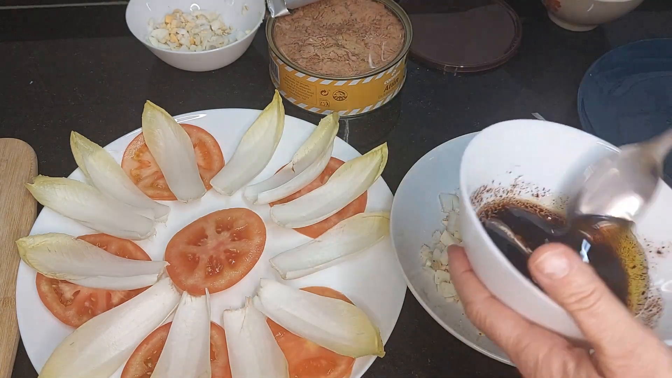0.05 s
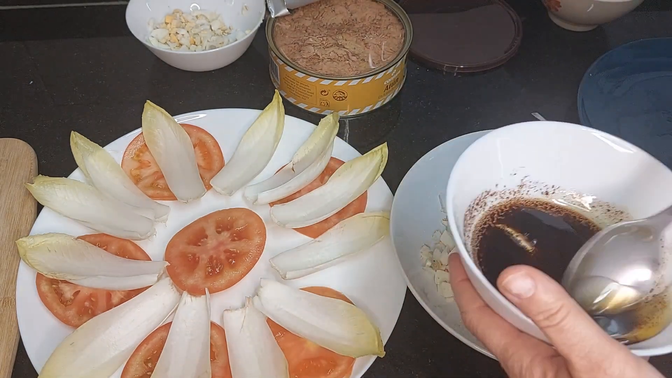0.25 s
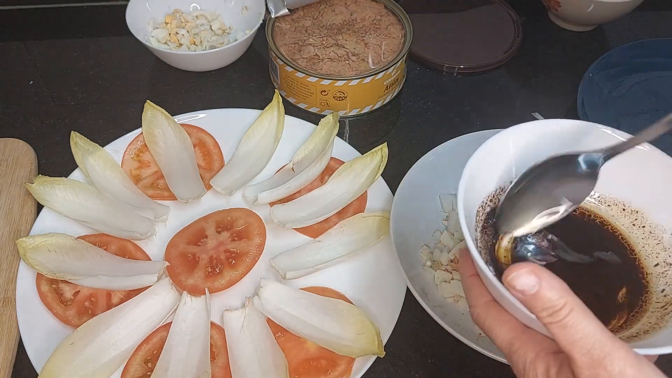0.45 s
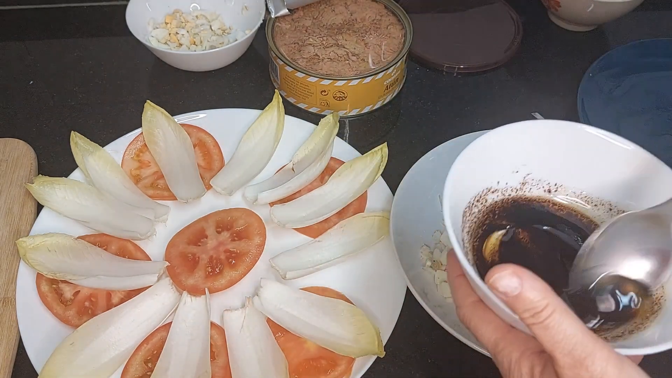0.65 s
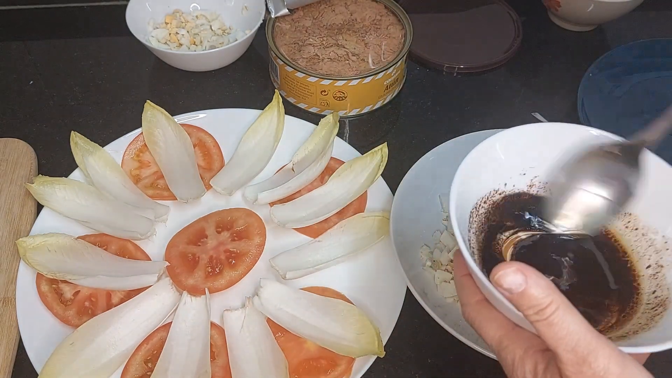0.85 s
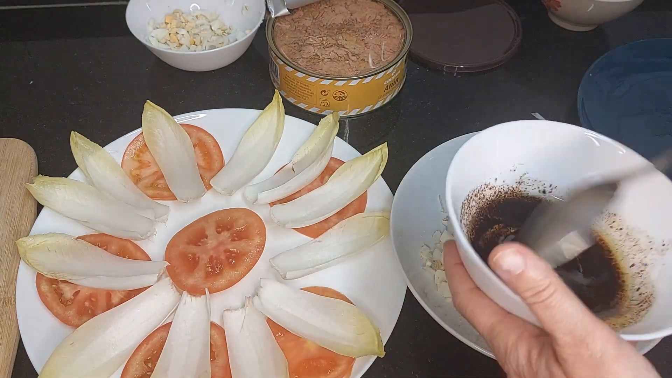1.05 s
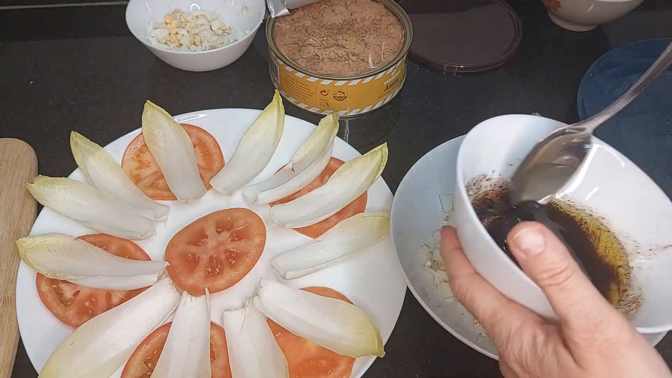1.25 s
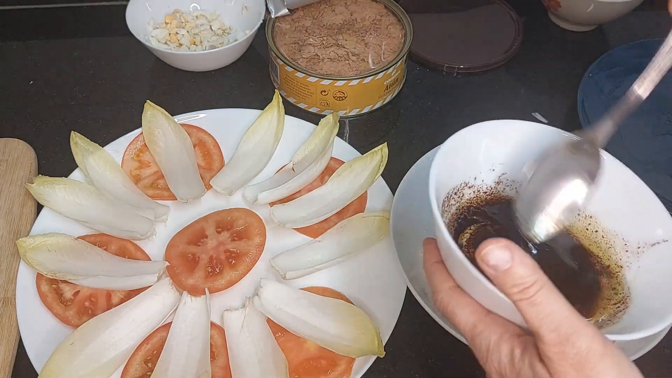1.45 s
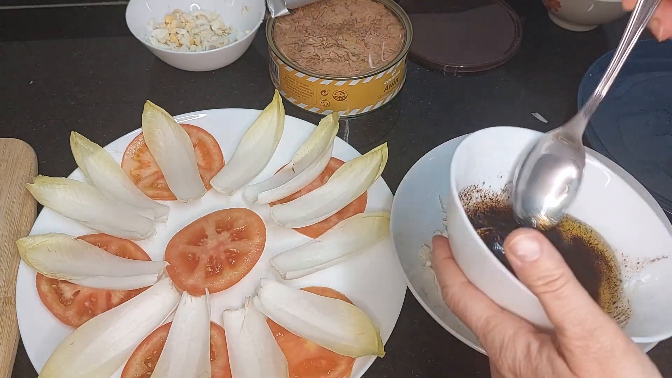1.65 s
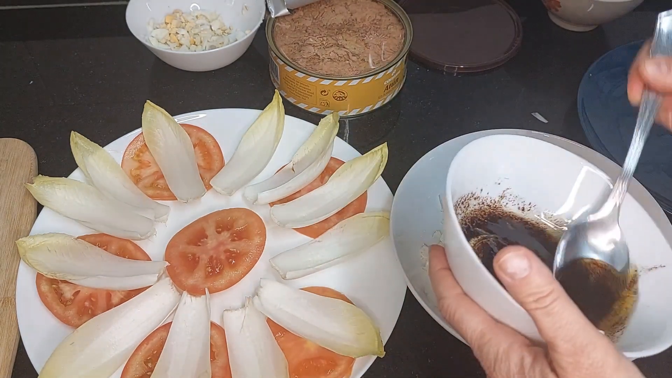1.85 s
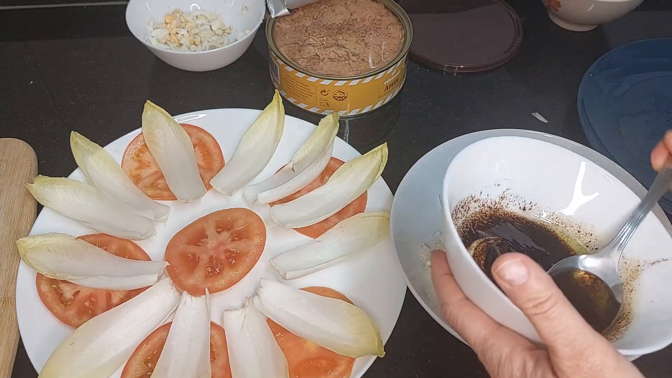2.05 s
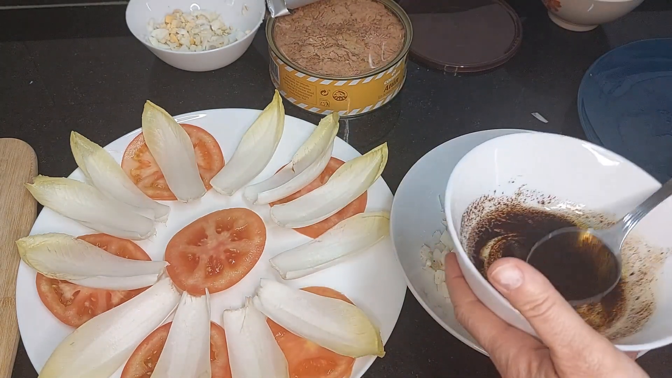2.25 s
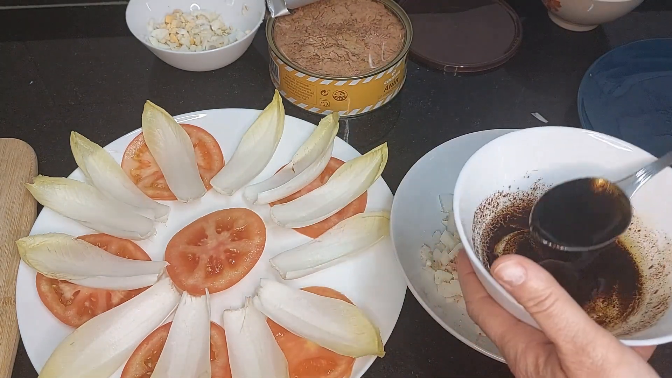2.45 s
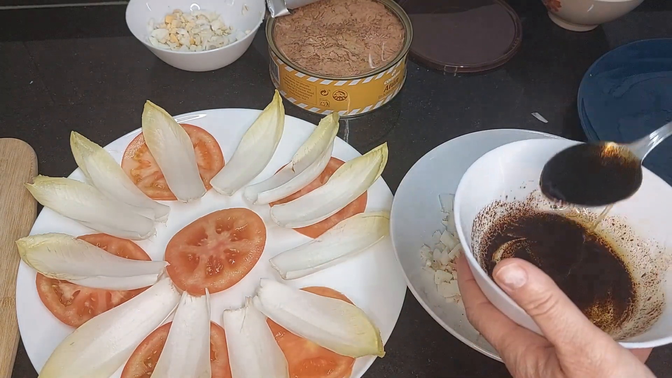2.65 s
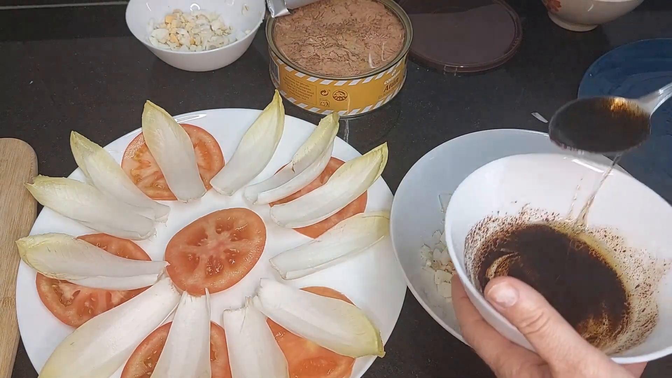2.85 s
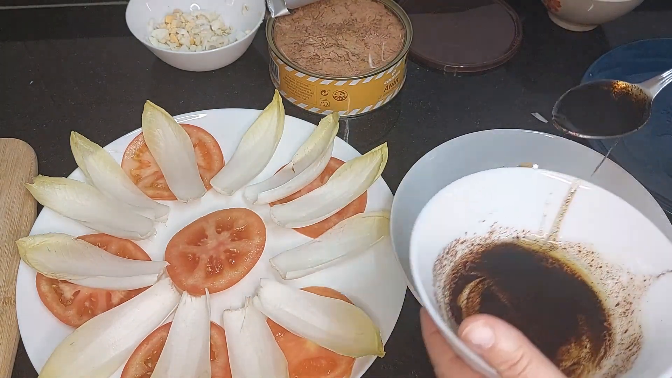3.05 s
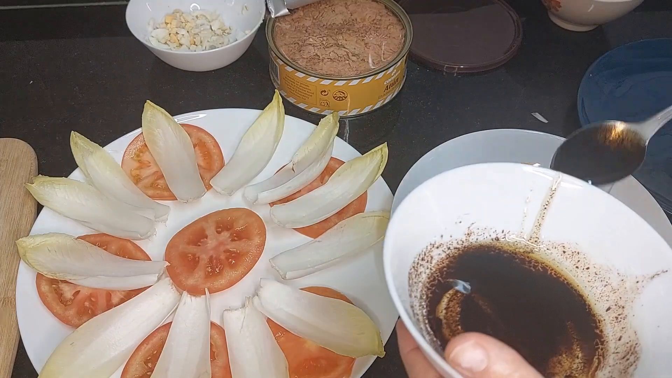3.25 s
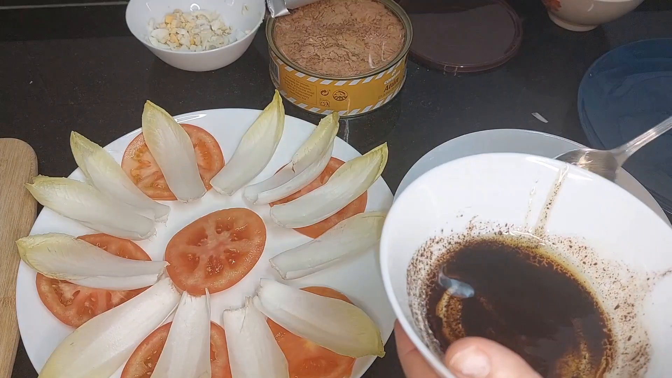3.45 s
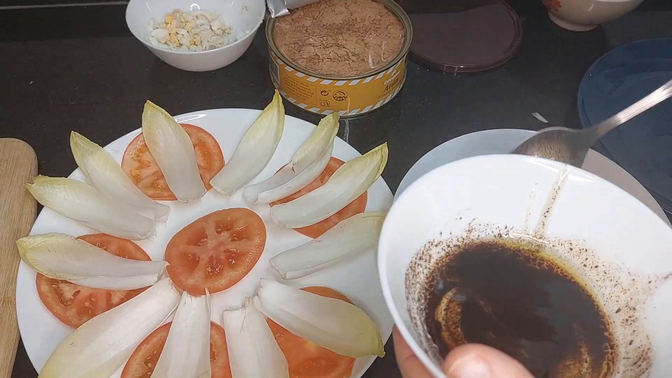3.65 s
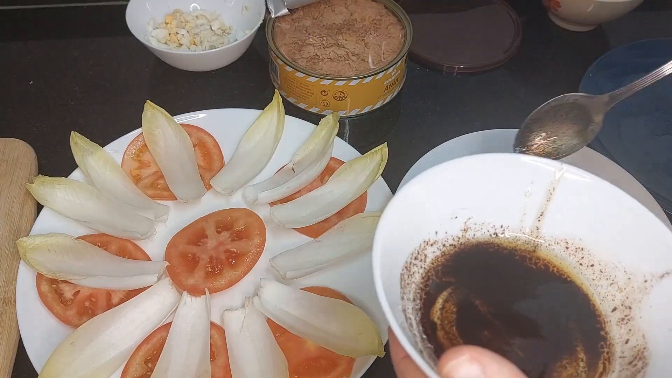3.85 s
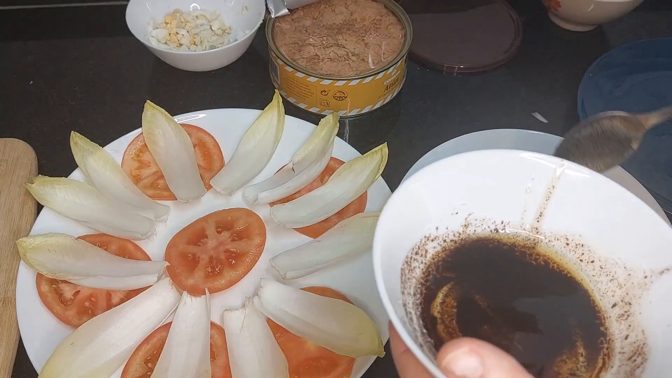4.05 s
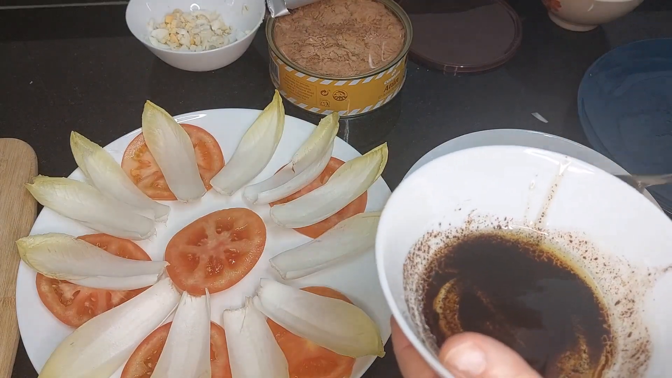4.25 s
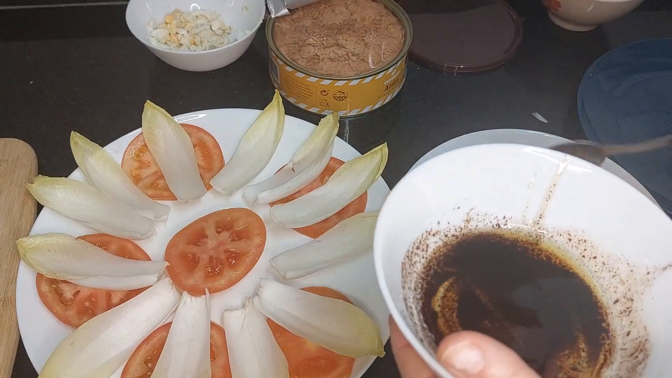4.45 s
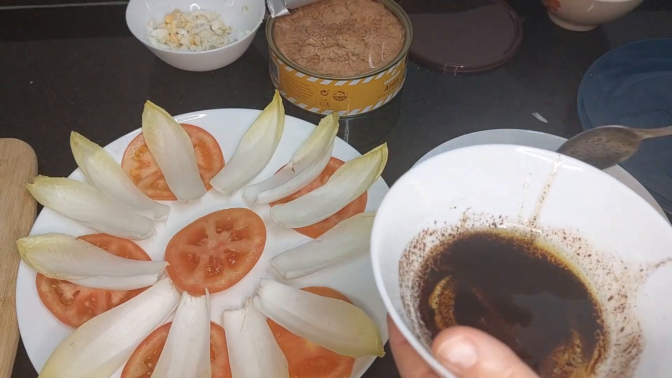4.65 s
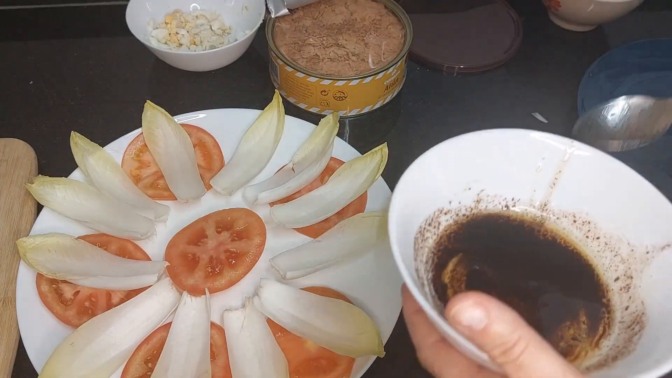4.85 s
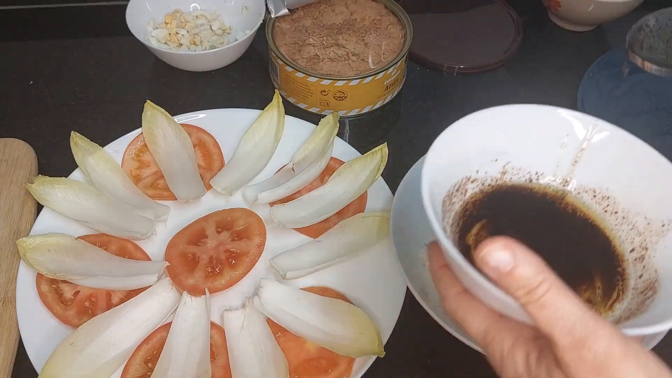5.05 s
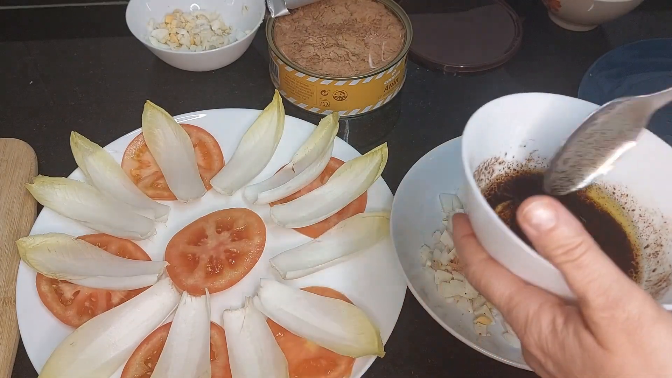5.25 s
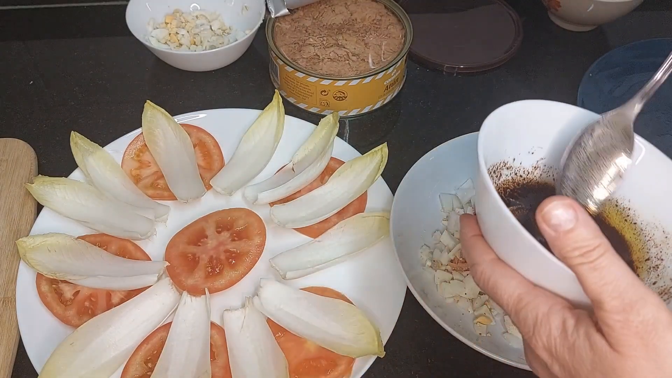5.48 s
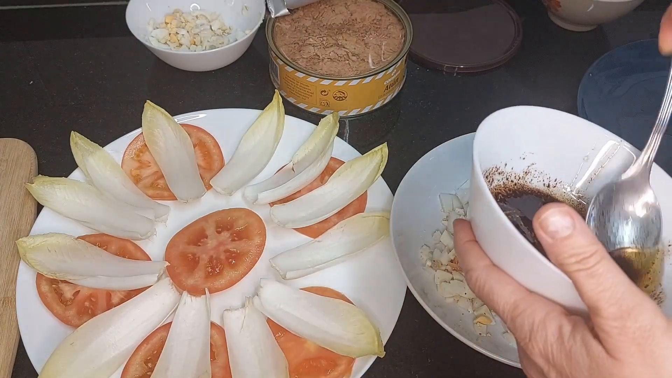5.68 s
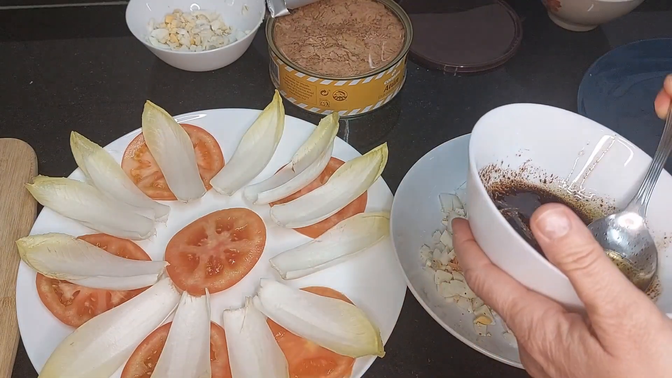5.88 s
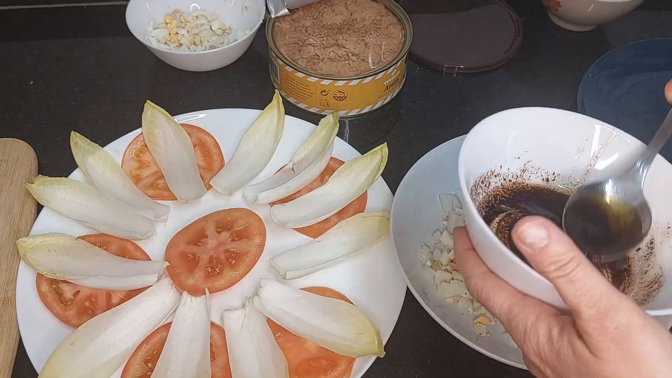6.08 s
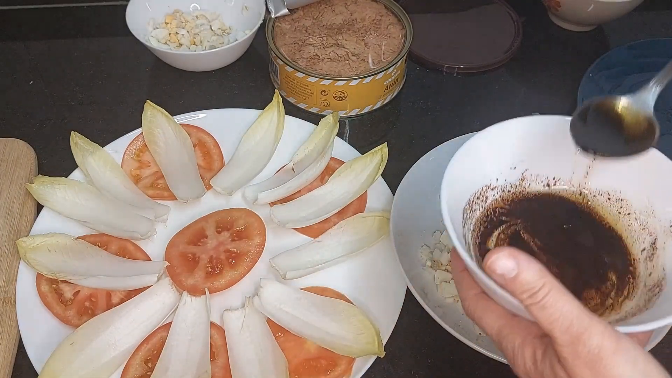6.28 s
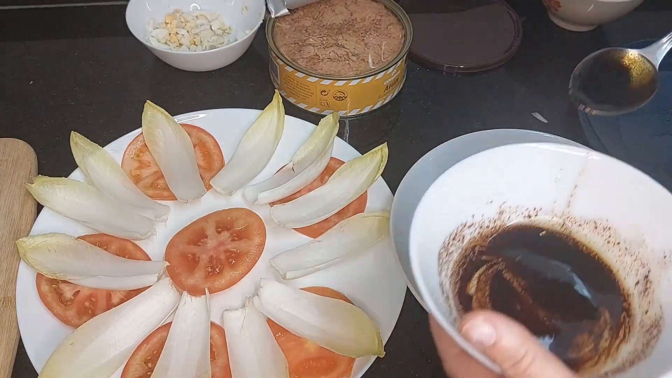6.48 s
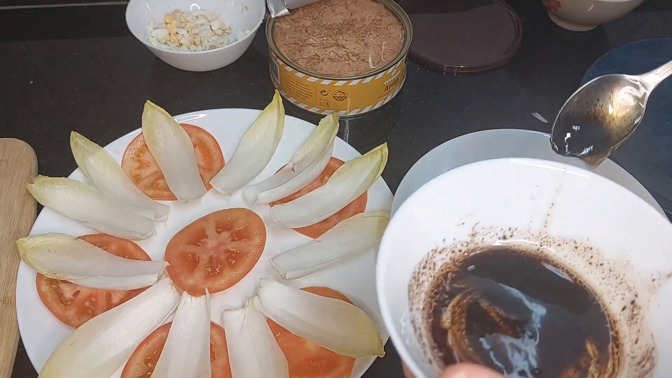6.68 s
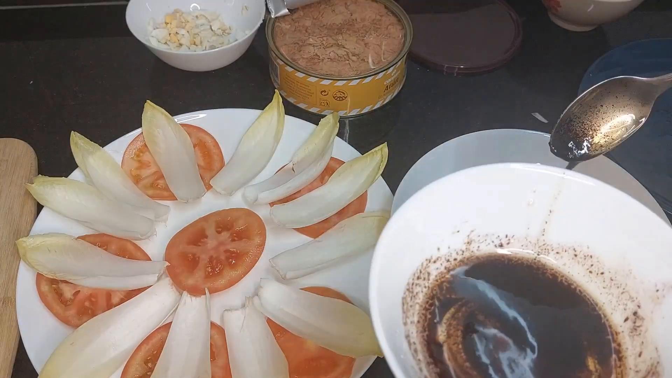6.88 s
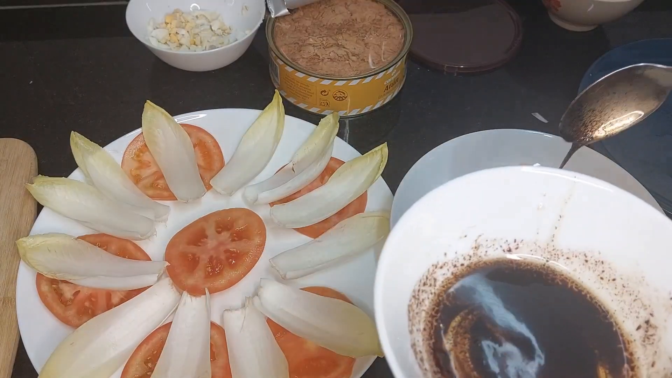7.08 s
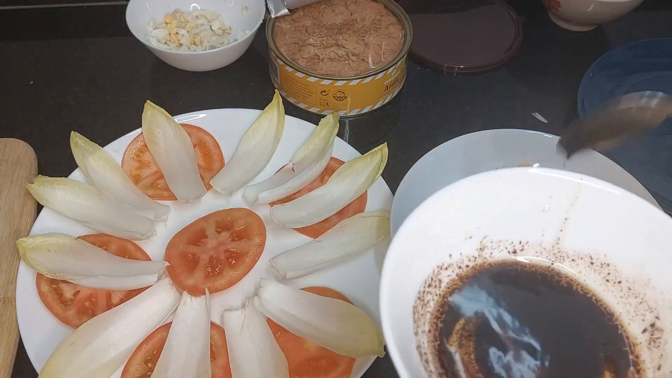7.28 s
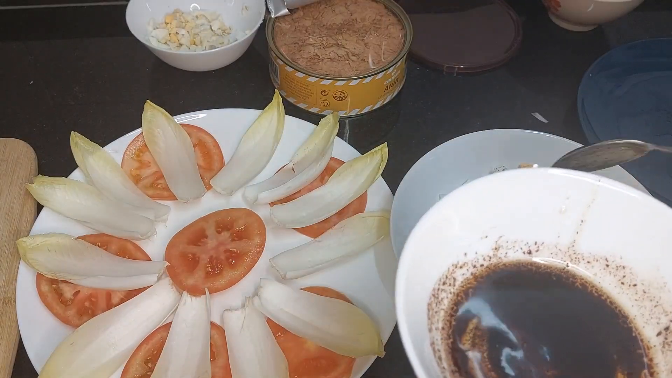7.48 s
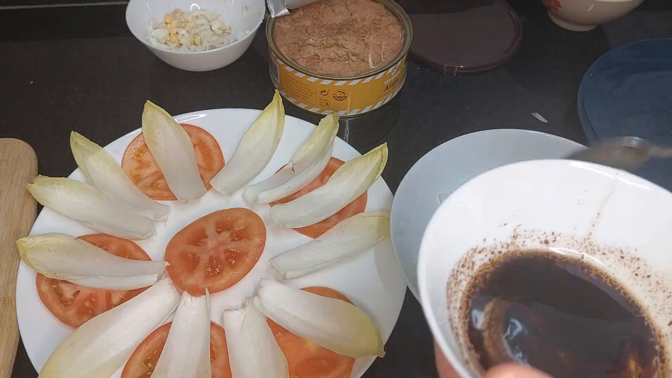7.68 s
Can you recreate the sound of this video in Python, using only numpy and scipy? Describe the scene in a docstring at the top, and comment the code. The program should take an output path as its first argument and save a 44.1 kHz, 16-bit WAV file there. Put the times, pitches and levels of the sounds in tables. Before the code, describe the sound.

The tail of a spoon clack fades at the start, then quick, moderate ceramic taps come at 0.1, 0.2 and 0.3 seconds amid soft, bright, grainy rubbing. Stronger single clacks land near 1.0 and 1.25. At 1.6 two hard knocks almost merge, the loudest moment, with a low table thud and clear rim ringing, cut short by another touch at 1.73. A bright clack follows at 1.97. From 2 to 5.4 only faint rustling remains over uneven distant traffic rumble, thin unsteady appliance whines and steady air hiss. Clacks return at 5.47, softer at 5.66, and firm at 5.88, with light sliding. Faint touches at 6.87, 7.15 and 7.38 lead to the end at about 7.7. The clacks are dry, damped by hand and sauce, with a short kitchen echo, heard closely in stereo.

```python
"""A clack of spoon on bowl is dying away as we begin, and more clacks soon follow in a quiet kitchen.
A steel spoon scoops dressing from a small hand-held ceramic bowl: each clack is a crowd of short sines.
Two quick knocks on the free rim add longer ringing sines, and sliding over the glaze is grainy noise.
Behind it, distant traffic rumbles in the room's low resonances (wavering tones and low noise),
appliances whine faintly (narrow tones), and steady noise makes the air and hiss."""
import sys
import numpy as np
from scipy import signal
from scipy.fft import rfft, irfft
from scipy.io import wavfile
from scipy.ndimage import uniform_filter1d

SR = 44100
rng = np.random.default_rng(int(sys.argv[2]) if len(sys.argv) > 2 else 0)


def dump_mix(stems):
    """Bounce the given channels to the path in sys.argv[1] as a 16-bit WAV at rate SR."""
    frames = np.atleast_2d(stems).T  # one column per channel
    limited = np.clip(frames, -1, 1)  # hard clip at full scale
    pcm = np.round(limited * 32767).astype(np.int16)
    wavfile.write(sys.argv[1], SR, pcm)


N = 340672   # length in samples
RUN_IN_S = .25   # extra time before the start, so that an earlier tap can leave its tail

# In all tables, t60 is the time a sound takes to fall by 60 dB.
# Room air and microphone hiss: (pitch [Hz], level [dB per Hz]), only the shape counts
AIR_COLOUR = [(20, -49), (46, -23), (74, -24), (160, -26), (300, -30.5), (600, -39), (1200, -41.5),
              (2500, -49), (6000, -57), (9500, -55), (12500, -54), (16000, -58.5)]
AIR_DB = -71.5
# How alike left and right are: (pitch [Hz], likeness [0 to 1])
LIKENESS = [(60, .92), (290, 0.69), (640, 0.1), (1400, 0.05), (15000, 0)]

# Rumble swells: (time [s], lowest resonance [dB], middle group [dB])
RUMBLE_SWELLS = [(0, -80, -80), (.43, -63, -79), (.73, -70, -76.5), (1.14, -69.5, -61.5),
                 (1.3, -56.5, -66.5), (1.56, -54, -59.5), (1.72, -65, -59), (2.0, -58.5, -65),
                 (2.43, -47.5, -63.5), (2.56, -65, -63.5), (2.86, -72, -62.5), (3.35, -53.5, -55),
                 (3.98, -61.5, -57.5), (4.36, -67, -59.5), (5.07, -52.5, -58), (5.28, -64, -64.5),
                 (5.88, -58.5, -62), (6.05, -49.5, -59.5), (6.16, -62.5, -64), (6.85, -60, -61),
                 (7.25, -69.5, -70), (7.36, -59, -64), (7.72, -62, -65)]
# Room resonances in a lowest, middle and upper group: (pitch [Hz], width [Hz], level on top of the swell [dB])
ROOM_RESONANCES = ([(66.1, 10, 3)], [(88.8, 4.1, -3.5), (100.7, 10.9, 0.5), (126.3, 13, -4.5)],
                   [(204.1, 31, -3.5), (228, 7.2, -1), (335, 4.9, -20.5)])
# Broad part of the rumble: (pitch [Hz], level [dB per Hz]), only the shape counts
WASH_COLOUR = [(20, -21), (50, -2.5), (160, -2.5), (300, -5.5), (600, -22), (1200, -42), (4000, -81)]
# The wash and the upper group swing with the middle group, by this many dB per dB around a pivot
SWELL_PIVOT_DB = -62.5
WASH_FOLLOWS, WASH_DB = 0.63, -67
UPPER_FOLLOWS, UPPER_DB = 1.8, -70.5

# Appliance whines, lowest first: (pitch [Hz])
WHINE_HZ = (312, 1395, 7973, 12392)
WHINE_WIDTH_HZ = (5, 3, 40, 10)
WHINE_LAG_RAD = (.2, 2.0, 1.5, 1.5)   # phase step between left and right
LOWEST_WHINE_DB, HIGHEST_WHINE_DB = -75.5, -84
# The second whine comes and goes: (start [s], length [s], level [dB])
SECOND_WHINE_SPELLS = [(2.95, 0.6, -77.5), (4.13, 0.66, -77), (6.1, 0.83, -85.5), (6.92, 0.27, -81),
                       (7.62, .2, -80)]
SECOND_WHINE_REST_DB, SECOND_WHINE_RISE_S, SECOND_WHINE_FALL_S = -87.5, 0.05, .1
# Slow swell of the third whine: (time [s], level [dB])
THIRD_WHINE_SWELL = [(0, -88), (2.2, -91), (3.4, -83), (4.3, -79.5), (5.1, -85.5), (7.72, -83.5)]

# Soft rustle of spoon and hands moving: (start [s], length [s], level [dB])
SLIDES = [(0, 0.49, -71.5), (.68, 0.86, -73), (1.8, 0.23, -69.5), (2.3, 0.16, -81.5), (2.88, 0.75, -78),
          (5.22, 0.75, -78), (6.7, 0.32, -77.5)]
# Colour of the rustle: (pitch [Hz], level [dB per Hz]), only the shape counts
SLIDE_COLOUR = [(590, -40), (1000, -28.5), (1190, -19), (1690, -6.5), (3570, -4), (4240, 1.5), (5650, 5.5),
                (15500, 5)]
SLIDE_REST_DB, SLIDE_RISE_S, SLIDE_FALL_S = -84, 0.031, .15

# The table top jolted by the hardest knock: (pitch [Hz], level [dB], t60 [s])
JOLT_MODES = [(67.4, -23.5, 0.077), (240, -27, 0.022)]
JOLT_S = 1.601

# Rim modes of the bowl, many split in pairs: (pitch [Hz])
RIM_HZ = (1865, 1925, 3227, 3357, 4862, 4908, 5290, 6771, 6859, 8974, 10800, 11980, 12986, 14285, 14644,
          14686)
# How each of those modes rings: (level within a knock [dB], t60 before the touch [s])
RIM_RING = [(-19.5, 0.3), (-18.5, 0.15), (-7, 0.25), (-10, 0.1), (-10.5, 0.26), (-19, 0.4), (-18.5, 0.14),
            (-22, 0.51), (-11, 0.18), (-22.5, .2), (-17.5, 0.078), (-18.5, 0.32), (-18.5, 0.48),
            (-20, 0.16), (-13.5, .16), (-18.5, 0.18)]
# Decay added once the spoon touches the rim: (pitch [Hz], t60 [s])
TOUCH_DAMPING = [(3300, .05), (4900, 0.94), (7000, .2)]
KNOCK_S, KNOCK_DB = (1.600, 1.623), (-17, -21)
TOUCH_S = 1.728   # the spoon lands and damps the ring
# Close weaker modes roughen the ring: spread (share of pitch), level, share of t60
NEIGHBOUR_SHIFT, NEIGHBOUR_DB, NEIGHBOUR_LASTS = .012, -9, .6

# Spoon on bowl, the first heard only as a tail: (time [s], level [dB], left over right [dB],
# tilt [dB per octave], bow [dB per octave squared],
# lead note pitch [Hz], lead note level within the tap [dB], lead note t60 [s])
TAPS = [(-0.04, -25, -1, 2.5, 1, 4700, -29, .07), (0.096, -23, -0.5, 0.5, -0.5, 4760, -32, 0.042),
        (0.114, -30, -1.5, -7, -1.5, 3500, -29, 0.052), (0.222, -40.5, -2.5, 0, 0.5, 905, -20, 0.076),
        (0.306, -23, -0.5, -1.5, 0, 3365, -20, 0.055), (0.476, -58.5, 1, -6, 0.5, 1640, -10, 0.054),
        (0.498, -48, -4, -10, -15, 1724, -12, 0.052), (0.68, -68.5, -3, 9.5, 3.5, 5560, -28, 0.055),
        (0.802, -69, 1, 4.5, 3, 5620, -4, 0.098), (0.915, -44, -2, -5.5, -0.5, 5560, -17.5, 0.063),
        (0.981, -13, 1, 0.5, 0, 3550, -17.5, 0.058), (1.248, -12, -2, 3, 1, 4390, -31, 0.29),
        (1.599, -11, -8, 3.5, 0, 3140, -22.5, 0.071), (1.622, -7.5, 1.5, 2, -0.5, 4990, -20, 0.066),
        (1.727, -15.5, 1, 1, -1, 3950, -7, 0.016), (1.884, -64.5, -3, 12, 0, 4900, -9, .07),
        (1.972, -13, 0, 2.5, -0.5, 5166, -17, 0.033), (5.469, -15, 0.5, 0.5, 0.5, 3450, -14, 0.072),
        (5.659, -21.5, -1, 0, -0.5, 3530, -22, 0.041), (5.74, -43.5, -1, 4, 2.5, 3440, -19, .07),
        (5.875, -12, 0.5, 2.5, 0, 3605, -20.5, 0.062), (6.865, -49.5, -2.5, 0, -0.5, 2220, -6.5, 0.042),
        (7.152, -60, -6.5, 0.5, 0.5, 4930, -13.5, .15), (7.378, -71.5, -0.5, 3.5, 4, 4810, -24.5, 0.052)]
# Clack modes damped by hand and sauce: (pitch [Hz], t60 [s])
CLACK_DECAY = [(400, 0.072), (1500, 0.038), (5000, 0.034), (15000, 0.016)]
# An average clack: (pitch [Hz], level within the tap [dB])
CLACK_COLOUR = [(400, -21.5), (600, -22.5), (850, -17.5), (1900, -13), (3500, -12.5), (5400, -13),
                (8000, -16.5), (12500, -15)]
PIVOT_HZ = 3500   # tilt and bow turn about this pitch
HUMP_DB, HUMP_OCTAVES = 6, 0.11   # modes near the lead note are struck harder
# Notes of the held bowl: (pitch [Hz], level within the tap [dB])
HELD_NOTES = [(480, -31.5), (880, -24), (1750, -22.5), (2550, -26.5), (3520, -20.5), (5000, -24.5),
              (6150, -26.5), (6800, -23.5)]
HELD_T60_S = .04   # the hand damps them
GRIP_SHIFT, GRIP_DB = .015, 2   # spread of their pitch (share) and level from tap to tap

# How the kitchen's echoes die away: (pitch [Hz], t60 [s])
KITCHEN_DECAY = [(300, .4), (800, 0.21), (2100, .3), (5500, 0.281), (14600, 0.2)]
KITCHEN_DB = -1.5   # level of the echo tail
CUTOFF_HZ = 16800   # the recorded treble stops here


def from_db(db):
    """Turns a level in dB into a gain to multiply by."""
    return 10 ** (np.asarray(db) / 20)


def rms_one(x):
    """Scales a sound so that its average strength (rms) is 1."""
    return x / np.sqrt(np.mean(x ** 2) + 1e-20)


def in_time(rows):
    """Joins the points of a time table by straight lines, one curve per column."""
    times, *columns = np.transpose(rows)
    return [np.interp(np.arange(N) / SR, times, column) for column in columns]


def at_hz(points, hz):
    """Reads a pitch table between its points, with equal steps per octave."""
    table_hz, values = np.transpose(points)
    return np.interp(np.log(hz), np.log(table_hz), values)


def add(out, s, sound):
    """Mixes a sound in at a time in seconds, counted from the end of the run-in."""
    i = round((s + RUN_IN_S) * SR)
    out[:, i:i + sound.shape[1]] += sound[:, :out.shape[1] - i]


def stereo_noise(colour):
    """Makes noise of a given colour, with the room's left-right likeness and rms 1."""
    hz = np.maximum(np.fft.rfftfreq(N, 1 / SR), 10)
    alike = np.clip(at_hz(LIKENESS, hz), -1, 1)
    mid, side = rfft(rng.standard_normal((2, N))) * from_db(at_hz(colour, hz))
    # the side part is added on the left and taken away on the right
    left_right = np.sqrt(1 + alike) * mid + np.sqrt(1 - alike) * side * [[1], [-1]]
    return rms_one(irfft(left_right, N))


def waver(hz, width_hz, evenness, count):
    """Tones that wander in phase and level; evenness 0 is noise in a resonance, 1 a steady level."""
    step, run_in = 20, 2000   # the wander is drawn at every 20th sample
    r = np.exp(-np.pi * width_hz * step / SR)
    re, im = rng.standard_normal((2, count, N // step + 1 + run_in))
    slow = re + 1j * im
    for _ in range(2):   # smooth it twice
        slow = signal.lfilter([1 - r], [1, -r], slow)
    slow = slow[:, run_in:]
    slow = slow / np.abs(slow) ** np.clip(evenness, 0, 1)
    slow = np.array([np.interp(np.arange(N) / step, np.arange(len(row)), row) for row in slow])
    slow = slow / np.sqrt(np.mean(np.abs(slow) ** 2) / 2)
    return slow * np.exp(2j * np.pi * hz * np.arange(N) / SR)


def spells(rows, rest_db, rise_s, fall_s):
    """Gain that rises from a resting level, holds and falls back for each row."""
    t = np.arange(N) / SR
    power = from_db(2 * rest_db)
    for s, length, db in rows:
        rise = (t - s) / rise_s + 1
        fall = (s + length - t) / fall_s + 1
        power = power + from_db(2 * db) * np.clip(np.minimum(rise, fall), 0, 1) ** 2
    return np.sqrt(power)


def ring(hz, db, t60, seconds, scatter, touch_s=1, touched_t60=1):
    """Sums dying sines with scattered phases; the higher the pitch, the less alike left and right."""
    t = np.arange(round(seconds * SR)) / SR
    fall = t / t60 + np.maximum(t - touch_s, 0) / touched_t60   # 1 means 60 dB down
    sines = from_db(db) * np.exp(2j * np.pi * hz * t - np.log(1000) * fall)
    common, *sides = scatter * rng.standard_normal((3, len(hz)))
    phases = common + np.minimum(hz[:, 0] / 2500, 1) * np.array(sides)
    attack = np.minimum(t / 0.0012, 1)
    return (np.exp(1j * phases) @ sines).imag * attack


def air():
    """Room air and microphone hiss: steady noise, strongest at low pitches."""
    return from_db(AIR_DB) * stereo_noise(AIR_COLOUR)


def rumble():
    """Distant traffic excites the room's low resonances, mostly alike on both sides, over a broad wash."""
    low_db, middle_db = in_time(RUMBLE_SWELLS)
    swing_db = middle_db - SWELL_PIVOT_DB
    upper_db = UPPER_DB + UPPER_FOLLOWS * swing_db
    out = from_db(WASH_DB + WASH_FOLLOWS * swing_db) * stereo_noise(WASH_COLOUR)
    for swell_db, group in zip([low_db, middle_db, upper_db], ROOM_RESONANCES):
        for hz, width_hz, db in group:
            common, left, right = waver(hz, width_hz, evenness=0.076, count=3).real
            alike = np.clip(at_hz(LIKENESS, hz), 0, 1)
            both = np.sqrt(alike) * common + np.sqrt(1 - alike) * np.array([left, right])
            out = out + from_db(db + swell_db) * both
    return out


def whines():
    """Appliances whine in four narrow, slightly unsteady tones, each shifted in phase between the sides."""
    fitful = spells(SECOND_WHINE_SPELLS, SECOND_WHINE_REST_DB, SECOND_WHINE_RISE_S, SECOND_WHINE_FALL_S)
    swelling = from_db(*in_time(THIRD_WHINE_SWELL))
    gains = [from_db(LOWEST_WHINE_DB), fitful, swelling, from_db(HIGHEST_WHINE_DB)]
    out = 0
    for gain, hz, width_hz, lag in zip(gains, WHINE_HZ, WHINE_WIDTH_HZ, WHINE_LAG_RAD):
        tone = waver(hz, width_hz, evenness=.5, count=1) * np.exp(1j * np.array([[0], [lag]]))
        out = out + gain * tone.real
    return out


def slides():
    """Soft rubbing: bright noise whose level jumps about in uneven grains."""
    grains = rms_one(uniform_filter1d(rng.standard_normal(N), size=200))
    rustle = rms_one(from_db(2.5 * grains) * stereo_noise(SLIDE_COLOUR))
    return spells(SLIDES, SLIDE_REST_DB, SLIDE_RISE_S, SLIDE_FALL_S) * rustle


def jolt():
    """The jolted table top gives a low thud: quickly dying sines that start with a dip."""
    out = np.zeros((2, N + round(RUN_IN_S * SR)))
    hz, db, t60 = np.transpose(JOLT_MODES)[:, :, None]
    add(out, JOLT_S, -ring(hz, db, t60, 0.51, scatter=0))
    return out[:, -N:]


def rim():
    """The rim rings clear until the spoon touches it; each mode beats with two close neighbours."""
    out = np.zeros((2, N + round(RUN_IN_S * SR)))
    hz = np.array(RIM_HZ)[:, None]
    mode_db, t60 = np.transpose(RIM_RING)[:, :, None]
    neighbours_hz = hz * (1 + NEIGHBOUR_SHIFT * rng.standard_normal((2, *hz.shape)))
    hz = np.vstack([hz, *neighbours_hz])
    mode_db = np.vstack([mode_db, mode_db + NEIGHBOUR_DB, mode_db + NEIGHBOUR_DB])
    t60 = np.vstack([t60, t60 * NEIGHBOUR_LASTS, t60 * NEIGHBOUR_LASTS])
    for s, db in zip(KNOCK_S, KNOCK_DB):
        strength_db = db + mode_db + 1.6 * rng.standard_normal(hz.shape)
        damping = at_hz(TOUCH_DAMPING, hz)
        add(out, s, ring(hz, strength_db, t60, .45, 0.26, TOUCH_S - s, damping))
    return out


def tilt_and_bow(hz, tilt_db, bow_db):
    """Level change in dB that makes one tap brighter, duller or more hollow than another."""
    octaves = np.log2(hz / PIVOT_HZ)
    return tilt_db * octaves + bow_db * octaves ** 2


def clack(tilt_db, bow_db, lead_hz):
    """The crowded modes of spoon and wall die fast; they shift with grip and contact point."""
    grid_hz = np.linspace(350, 15800, 100)[:, None]
    shift, strength = rng.standard_normal((2, len(grid_hz), 1))
    hz = grid_hz + 60 * shift
    mode_db = at_hz(CLACK_COLOUR, hz) + tilt_and_bow(hz, tilt_db, bow_db) - 12.0 + 3.5 * strength
    hump_db = HUMP_DB * np.exp(-.5 * (np.log2(hz / lead_hz) / HUMP_OCTAVES) ** 2)
    return ring(hz, mode_db + hump_db, at_hz(CLACK_DECAY, hz), 0.12, scatter=2.2)


def bowl_notes(tilt_db, bow_db, lead_hz, lead_db, lead_t60):
    """The held bowl's notes and one lead note stand out, each a close triple that beats roughly."""
    held_hz, held_db = np.transpose(HELD_NOTES)
    shift, strength = rng.standard_normal((2, len(HELD_NOTES)))
    centre_hz = [*held_hz * (1 + GRIP_SHIFT * shift), lead_hz]
    centre_db = [*held_db + tilt_and_bow(held_hz, tilt_db, bow_db) + GRIP_DB * strength, lead_db]
    hz = np.outer(centre_hz, [.975, 1, 1.03]).reshape(-1, 1)
    db = np.add.outer(centre_db, [-8, 0, -7]).reshape(-1, 1)
    t60 = np.repeat([HELD_T60_S] * len(HELD_NOTES) + [lead_t60], repeats=3)[:, None]
    return ring(hz, db, t60, max(2 * HELD_T60_S, lead_t60), scatter=0.9)


def taps():
    """Each touch of spoon on bowl sets off a clack and the bowl's notes, placed left or right by level."""
    out = np.zeros((2, N + round(RUN_IN_S * SR)))
    for s, db, pan_db, tilt_db, bow_db, lead_hz, lead_db, lead_t60 in TAPS:
        pan = from_db([[db + pan_db / 2], [db - pan_db / 2]])
        add(out, s, pan * clack(tilt_db, bow_db, lead_hz))
        add(out, s, pan * bowl_notes(tilt_db, bow_db, lead_hz, lead_db, lead_t60))
    return out


def kitchen(x):
    """Direct sound plus a dense echo tail: unrelated noise per side, dying band by band."""
    t = np.arange(int(.6 * SR)) / SR
    edges = 250 * 2 ** np.arange(0, 6.1, .5)   # half-octave bands, in Hz
    tail = 0
    for low, high in zip(edges, edges[1:]):
        band_pass = signal.butter(2, [low, high], "band", fs=SR, output="sos")
        band = signal.sosfilt(band_pass, rng.standard_normal((2, len(t))))
        tail = tail + band * from_db(-60 * t / at_hz(KITCHEN_DECAY, np.sqrt(low * high)))
    tail = tail * np.minimum(t / 0.0038, 1)   # the echoes build up over a few ms
    tail = tail / np.sqrt(np.sum(tail ** 2, axis=1, keepdims=True))
    wet = signal.fftconvolve(x, tail, axes=1)[:, :x.shape[1]]
    return (x + from_db(KITCHEN_DB) * wet)[:, -N:]   # drop the run-in


def scene():
    """Air, rumble, whines, slides and jolt lie under the taps and rim, which alone get the kitchen's echo."""
    background = air() + rumble() + whines()
    return background + slides() + jolt() + kitchen(rim() + taps())


def record(dry):
    """The highest treble droops and is then cut off steeply."""
    droop = signal.sosfilt(signal.butter(4, 15400, fs=SR, output="sos"), dry)
    return signal.sosfilt(signal.cheby2(12, 60, CUTOFF_HZ, fs=SR, output="sos"), droop)


dry = scene()
out = record(dry)
dump_mix(out)
```